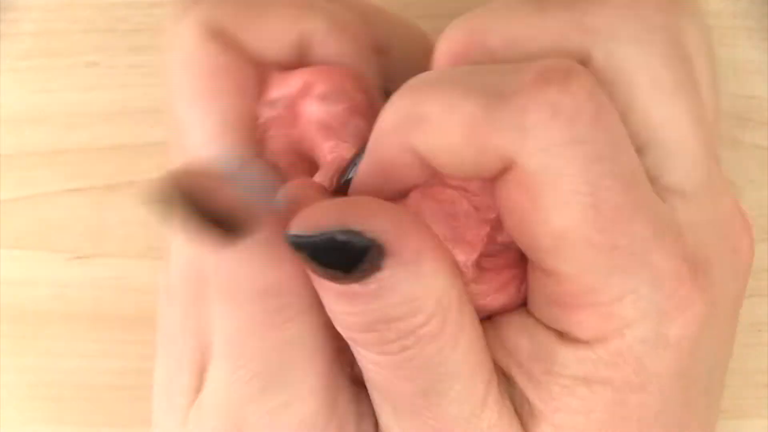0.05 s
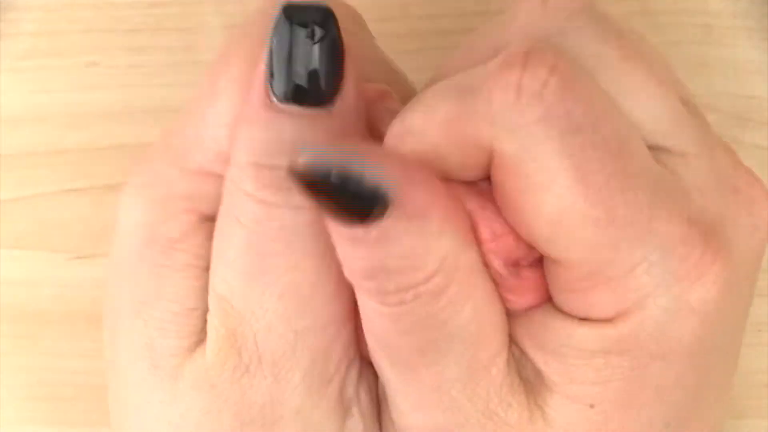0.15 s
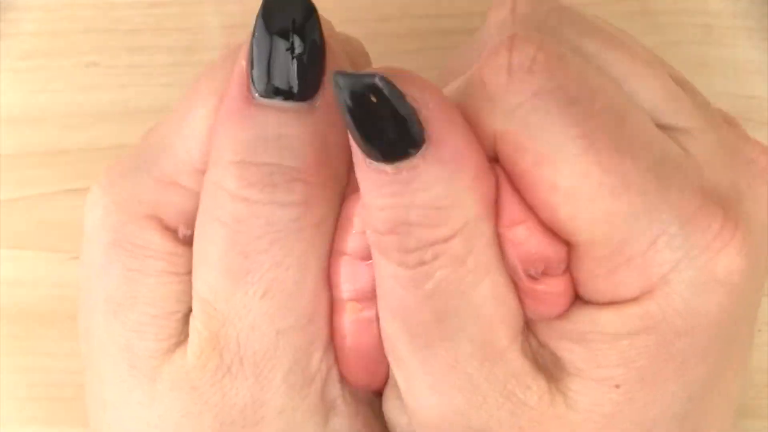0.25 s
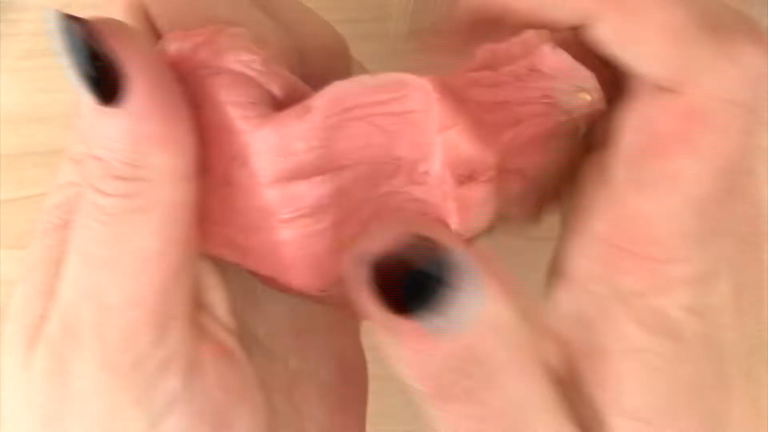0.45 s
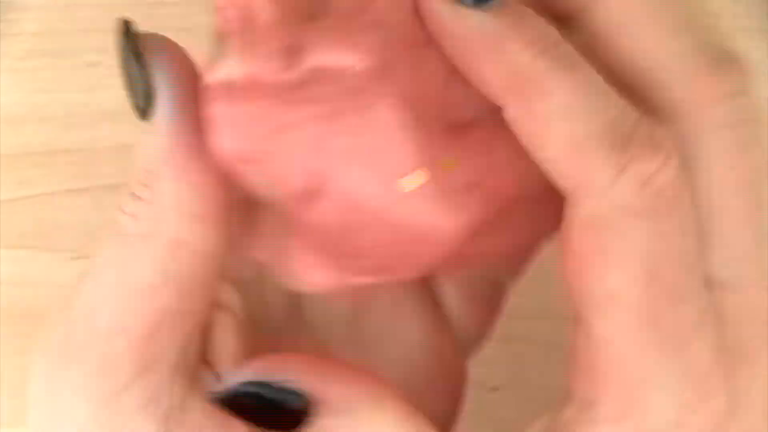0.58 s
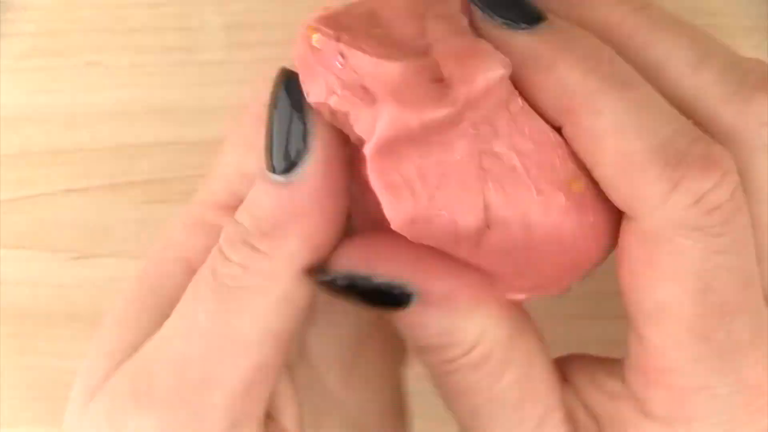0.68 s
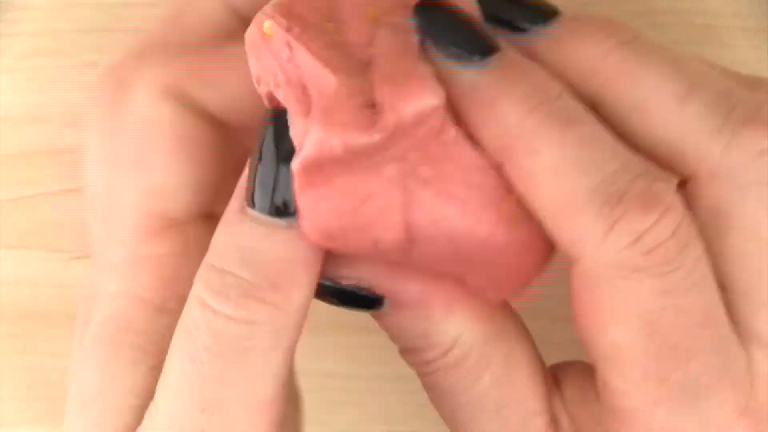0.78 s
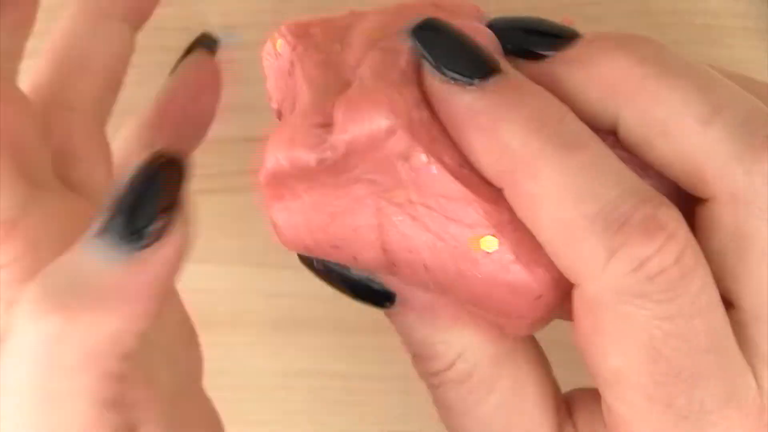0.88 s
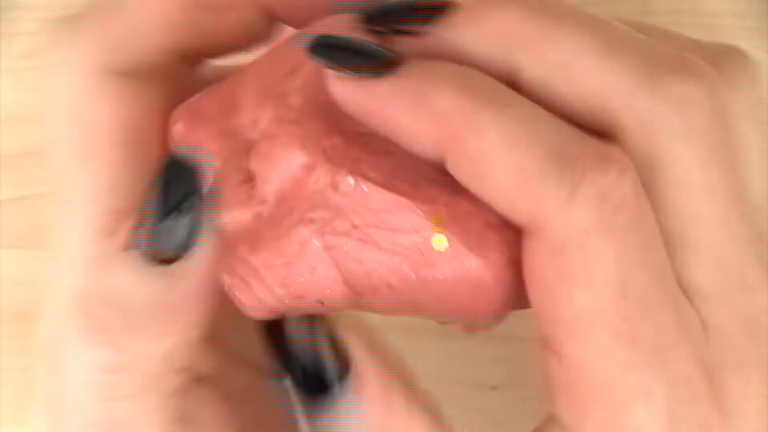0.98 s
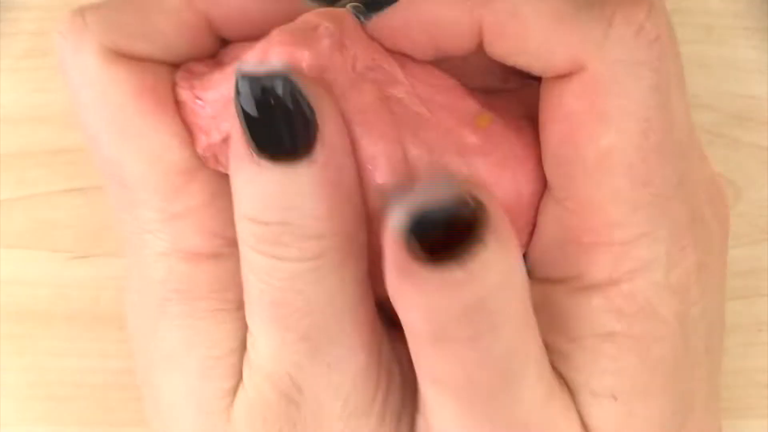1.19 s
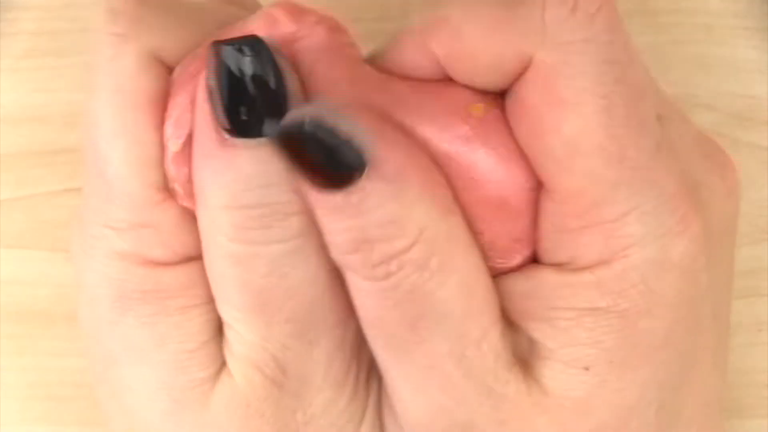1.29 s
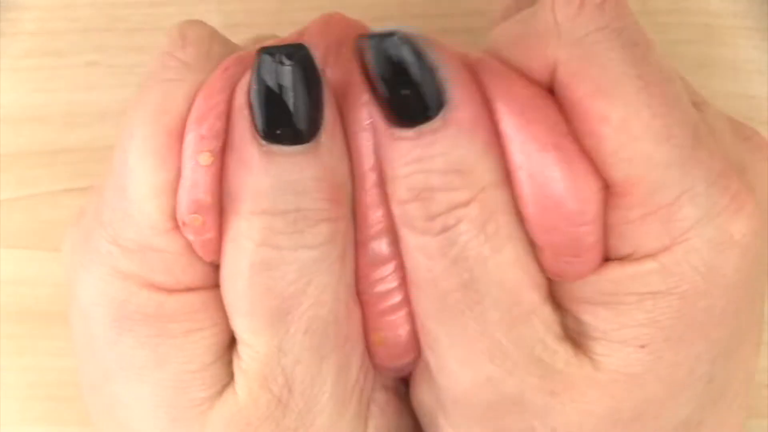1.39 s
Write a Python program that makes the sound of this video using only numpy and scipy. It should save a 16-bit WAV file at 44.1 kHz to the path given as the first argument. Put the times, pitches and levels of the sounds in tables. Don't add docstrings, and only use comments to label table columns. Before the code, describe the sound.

Wet slime pops sharply between squeezing fingers, followed by soft sticky crackles and one late click

```python
import sys
import numpy as np
from scipy import signal
from scipy.io import wavfile
from scipy.ndimage import uniform_filter1d

SR = 44100
rng = np.random.default_rng(int(sys.argv[2]) if len(sys.argv) > 2 else 0)


def generate_wav(signal):
    frames = np.transpose(np.atleast_2d(signal))
    scaled = np.clip(frames, -1, 1) * 32767
    pcm = np.round(scaled).astype(np.int16)
    wavfile.write(sys.argv[1], SR, pcm)


def amplitude_ratio(level_db):
    exponent = np.asarray(level_db, float) / 20
    return 10 ** exponent


N = 63945


def evened(x):
    return x / np.sqrt(np.mean(x ** 2) + 1e-20)


def read(points, hz):
    f, value = np.transpose(points)
    return np.interp(np.log(hz + 1), np.log(f + 1), value)


def add(mix, start_s, sound):
    part = mix[max(round(start_s * SR), 0):][:len(sound)]
    part += sound[:len(part)]


def resonate(x, hz, width_hz):
    turn = np.exp(2j * np.pi * hz * np.arange(len(x)) / SR)
    r = np.exp(-np.pi * width_hz / SR)
    return 2 * (turn * signal.lfilter([1 - r], [1, -r], x / turn)).real


def causal(colour, tilt_db=0):
    knee_hz = 5000
    hz = abs(np.fft.fftfreq(1024, 1 / SR))
    octaves = np.log2(np.maximum(hz, knee_hz) / knee_hz)
    log_gain = np.log(amplitude_ratio(read(colour, hz) + tilt_db * octaves))
    return np.fft.ifft(np.exp(log_gain - 1j * signal.hilbert(log_gain).imag)).real[:512]


def snaps():
    # t/s, peak level/dB, brightness/(dB/octave)
    films = [(0.0375, -46, -4), (0.0432, -51, 1), (0.0695, -41, 0), (0.1159, -56, 3), (0.148, -47, -6),
             (0.1988, -47, 0), (0.2185, -17, -11), (0.2196, -20, -12), (0.2505, -20, -8), (0.2512, -21, -8),
             (0.2634, -18, -5), (0.27, -7.5, -1), (0.304, -33, -10), (0.3152, -27, 1), (0.3231, -8, 9),
             (0.3336, -20, 0), (0.3441, -32, 8), (0.3566, -37, 2), (0.5885, -47, -12), (0.6672, -51, -3),
             (0.677, -57, -10), (0.685, -58, 0), (0.7213, -56, -5), (1.2501, -46, -6), (1.2826, -59, 0),
             (1.327, -58, -8), (1.3837, -21, 0), (1.4013, -43, 2), (1.4327, -47, -10), (1.4392, -50, -5)]
    # f/Hz, level/dB
    click_colour = [(100, -32), (450, -11), (1000, -13), (2000, -4), (3600, 0), (6000, -3), (14000, -6),
                    (17000, -24)]
    gain_db, tear_db, ragged, tear_t60_s = 1.5, -28, .28, .009
    bounce_s, bounce_db = .0006, -11
    out = np.zeros(N)
    treble = signal.butter(2, 5000, "high", fs=SR)
    t = np.arange(400) / SR
    rags = rng.standard_normal((len(films), 400))
    for (start_s, db, bright_db), rag in zip(films, rags):
        click = causal(click_colour, bright_db)
        click = click / abs(signal.hilbert(signal.lfilter(*treble, click))).max()
        tear = rag * amplitude_ratio(tear_db - ragged * db - 60 * t / tear_t60_s)
        add(out, start_s, amplitude_ratio(db + gain_db) * np.convolve(click, np.append(1, tear)))
    bounce = np.append(np.zeros(round(bounce_s * SR)), out)[:N]
    return out + amplitude_ratio(bounce_db) * bounce


def pops():
    # t/s, peak level/dB, f/Hz, t60/s
    pockets = [(0.0438, -46, 1600, 0.015), (0.0467, -44, 3600, 0.0042), (0.1314, -59, 600, 0.024),
               (0.1341, -60, 10500, 0.005), (0.1955, -54, 9500, 0.005), (0.2184, -22, 440, 0.008),
               (0.21848, -2, 3100, 0.0036), (0.21952, -1, 3650, 0.0035), (0.2502, -18, 3450, 0.011),
               (0.2503, -25, 1070, 0.012), (0.2518, -20, 2450, 0.01), (0.2697, -29, 1300, 0.005),
               (0.304, -29, 2400, 0.005), (0.3394, -30, 3200, 0.0048), (0.4713, -46, 6570, 0.006),
               (0.4972, -44, 430, 0.02), (0.5102, -31, 3600, 0.007), (0.6675, -51, 1800, 0.0066),
               (0.7211, -44, 4500, 0.007), (0.8206, -58, 690, 0.03), (0.8302, -46, 3640, 0.0042),
               (0.8824, -48, 7500, 0.006), (0.8928, -38, 3400, 0.0048), (0.8993, -40, 700, 0.018),
               (0.8997, -34, 3350, 0.006), (0.9165, -46, 700, 0.04), (1.103, -60, 1700, 0.008),
               (1.116, -55, 1650, 0.015), (1.2498, -42, 2200, 0.006), (1.4019, -38, 3600, 0.0042),
               (0.032, -52, 1600, 0.01), (0.21905, -11, 2400, 0.005), (0.2503, -31, 560, 0.012),
                    (0.27, -32, 500, 0.012), (0.474, -50, 6500, 0.005), (0.5002, -37, 3680, 0.007),
                    (0.5122, -44, 470, 0.025), (0.587, -52, 4500, 0.01), (0.677, -55, 3100, 0.006),
                    (0.7219, -42, 3400, 0.0048), (0.8195, -50, 3000, 0.005), (0.837, -53, 2900, 0.01),
                    (0.846, -52, 3300, 0.008), (0.8512, -55, 3300, 0.0048), (0.9052, -39, 3500, 0.005),
                    (0.957, -58, 3400, 0.008), (1.187, -60, 3600, 0.01), (1.2499, -41, 1200, 0.006),
                    (1.4071, -44, 2700, 0.0048), (1.4143, -51, 7800, 0.006), (1.4325, -48, 1900, 0.004),
                    (1.434, -47, 990, 0.02),
               (0.2535, -26, 2400, 0.014), (0.2545, -29, 1100, 0.015), (0.2706, -21, 3600, 0.008),
                   (0.3039, -32, 750, 0.006), (0.3075, -37, 1100, 0.012), (0.3141, -34, 1000, 0.004),
                   (0.3251, -30, 7000, 0.003), (0.328, -34, 9500, 0.006), (0.3335, -34, 1500, 0.006),
                   (0.4975, -54, 135, 0.08), (0.5012, -40, 3650, 0.008), (0.5062, -39, 3650, 0.008),
                   (0.5124, -38, 3650, 0.01), (0.5153, -42, 3050, 0.008), (0.5105, -46, 1250, 0.012),
                   (0.5055, -46, 1800, 0.01), (0.548, -48, 3140, 0.008), (0.803, -58, 3350, 0.006),
                   (0.808, -53, 3380, 0.006), (0.87, -54, 3600, 0.006), (0.896, -46, 1200, 0.012),
                   (0.8982, -39, 970, 0.014), (0.9012, -38, 3100, 0.006), (0.9045, -47, 700, 0.03),
                   (0.9105, -49, 3400, 0.008), (0.927, -54, 720, 0.08), (1.084, -64, 1700, 0.008),
                   (1.134, -60, 4800, 0.005), (1.268, -60, 3700, 0.006), (1.295, -58, 5000, 0.006),
                   (1.299, -56, 4400, 0.01), (1.365, -60, 4200, 0.006), (1.38365, -39, 1800, 0.004),
                   (1.3885, -50, 5000, 0.006), (0.132, -58, 360, 0.06), (0.259, -34, 1650, 0.008),
                   (0.825, -55, 2600, 0.01), (0.8415, -54, 3600, 0.006)]
    out, t = np.zeros(N), np.arange(4000) / SR
    for start_s, db, hz, t60_s in pockets:
        u = t / max(t60_s, 1 / hz)
        rise = 1 + .06 * np.minimum(u, 1)
        onset = 1 - np.exp(-t * hz / .4)
        ring = np.sin(2 * np.pi * hz * t * rise) * onset
        add(out, start_s, amplitude_ratio(db + 3 - 60 * u) * ring)
    return out


def squelch():
    # peak t/s, level/dB, rise/(s per 20 dB), fall/(s per 20 dB), hollowness/dB
    squeezes = [(.006, -61, .02, .04, -10), (.042, -52, .018, .019, -12), (.095, -66, .04, .04, -10),
                (.13, -65, .03, .04, 0), (.17, -67, .06, .08, -9), (.254, -39, .005, .03, -8),
                (.3, -42, .03, .035, -8), (.34, -51, .02, .07, -14), (.472, -62, .02, .04, -18),
                (.506, -47, .02, .042, -18), (.552, -56, .03, .03, -14), (.59, -59, .015, .02, -14),
                (.615, -61, .03, .05, -14), (.678, -63, .02, .04, -14), (.723, -65, .03, .07, -14),
                (.835, -64, .06, .05, -6), (.9, -49, .028, .025, -4), (.957, -68, .02, .04, -3),
                (1.09, -69, .05, .06, -8), (1.19, -70, .05, .06, -8), (1.254, -60, .005, .04, -8),
                (1.297, -67, .04, .07, -12), (1.41, -60, .03, .05, -8), (1.44, -62, .02, .04, -3)]
    # f/Hz, level/dB
    crackle_colour = [(150, -15), (420, -7), (1400, -7), (2600, -8), (3600, -3), (4600, -10), (13000, -16),
                      (16500, -32)]
    grains_per_s, spread_db, ringing_db = 4000, 3.0, -4
    hollow_hz, hollow_width_hz, hollow_gain_db, linger = 730, 330, -12, 1.9
    t, press, hollow = np.arange(N) / SR, np.zeros(N), np.zeros(N)
    for peak_s, db, rise_s, fall_s, hollow_db in squeezes:
        before = np.maximum(peak_s - t, 0) / rise_s
        after = np.maximum(t - peak_s, 0) / fall_s
        press += amplitude_ratio(db - 20 * (before + after))
        hollow += amplitude_ratio(db + hollow_db + hollow_gain_db - 20 * (before + after / linger))

    chance, size, pick, sign = rng.random((N, 4)).T
    sizes = amplitude_ratio(-spread_db * np.log(size + .004))
    ticks = np.sign(sign - .5) * sizes * (chance < grains_per_s / SR)
    crackle = evened(signal.oaconvolve(ticks, causal(crackle_colour))[:N])

    kind = (pick * 60).astype(int)
    bubbles = np.zeros(N)
    for k, hz in enumerate(np.geomspace(1300, 7500, 12)):
        bubbles += amplitude_ratio(read(crackle_colour, hz)) * resonate(ticks * (kind == k), hz, hz / 14)

    cupped = resonate(ticks, hollow_hz, hollow_width_hz)
    cupped = resonate(cupped, hollow_hz, hollow_width_hz)
    wet = evened(crackle + amplitude_ratio(ringing_db) * evened(bubbles))
    return press * wet + hollow * evened(cupped)


def tail(decays, delay_s):
    taps, at = np.zeros(SR // 2), np.arange(0, SR // 2 - 20, 12)
    taps[at + rng.integers(0, 12, len(at))] = rng.choice([-1., 1.], len(at))
    hz, t, z = signal.stft(taps, SR, nperseg=128)
    t60_s = np.maximum(read(decays, hz), .01)
    z = z * amplitude_ratio(-60 * t / t60_s[:, None])
    out = signal.istft(z, SR, nperseg=128)[1]
    return np.append(np.zeros(round(delay_s * SR)), out / np.linalg.norm(out))


def space(x):
    # f/Hz, t60/s
    near_decays = [(300, .08), (1500, .09), (3600, .09), (7000, .06), (14000, .05)]
    # f/Hz, t60/s
    room_decays = [(200, .5), (1000, .4), (3600, .35), (8000, .3), (14000, .2)]
    near_db, room_db = -11, -28
    cup_hz, cup_width_hz, cup_db = 3600, 900, -10
    near = signal.fftconvolve(x, tail(near_decays, .0011))[:N]
    near = near + amplitude_ratio(cup_db) * resonate(near, cup_hz, cup_width_hz)
    room = signal.fftconvolve(x, tail(room_decays, .008))[:N]
    return x + amplitude_ratio(near_db) * near + amplitude_ratio(room_db) * room


def air():
    # f/Hz, density/(dB per Hz)
    hiss_colour = [(50, -25), (90, -1), (200, -3), (1300, -16), (3600, -14), (5500, -18), (15500, -22),
                   (16200, -45)]
    hiss_db, hum_db, rumble_db = -73, -82, -94
    hum_hz, rumble_hz = 61, 30
    hz = np.fft.rfftfreq(512, 1 / SR)
    a, b, patches = rng.standard_normal((N // 128 + 5, 257, 3)).T
    patches = uniform_filter1d(patches, size=10, axis=0)
    patches = evened(uniform_filter1d(patches, size=12, axis=1))
    z = (a + 1j * b) * amplitude_ratio(read(hiss_colour, hz)[:, None] + 1.5 * patches)
    hiss = evened(signal.istft(z, nperseg=512, noverlap=384)[1][:N])
    hum, rumble = rng.standard_normal((N, 2)).T
    hum = evened(resonate(resonate(hum, hum_hz, 8), hum_hz, 30))
    rumble = evened(resonate(resonate(rumble, rumble_hz, 30), rumble_hz, 30))
    return amplitude_ratio(hiss_db) * hiss + amplitude_ratio(hum_db) * hum + amplitude_ratio(rumble_db) * rumble


def scene():
    low_cut = signal.butter(3, 170, "high", fs=SR, output="sos")
    slime = signal.sosfilt(low_cut, snaps() + pops() + squelch())
    return (space(slime) + air())[None]


def roll_off(x):
    return signal.sosfilt(signal.butter(12, 17060, fs=SR, output="sos"), x)


def record(dry):
    edge = signal.firwin(255, 16900, window=("kaiser", 9), fs=SR)
    mix = signal.oaconvolve(dry, edge[None], "same")
    return roll_off(mix)


dry = scene()
out = record(dry)
generate_wav(out)
```